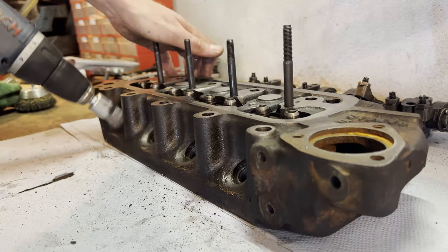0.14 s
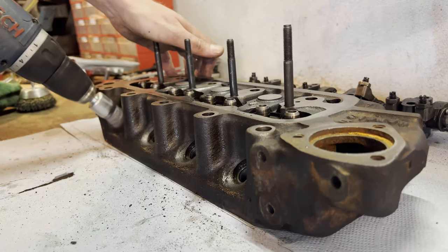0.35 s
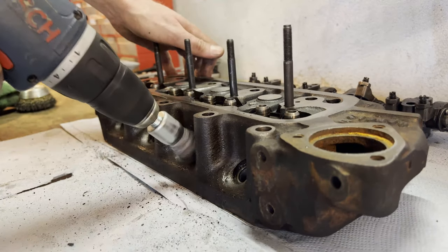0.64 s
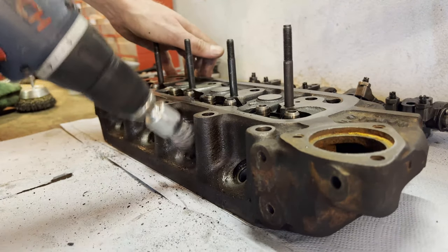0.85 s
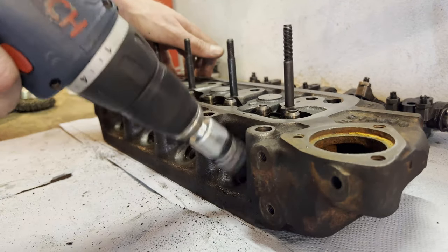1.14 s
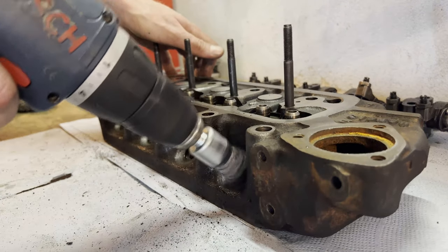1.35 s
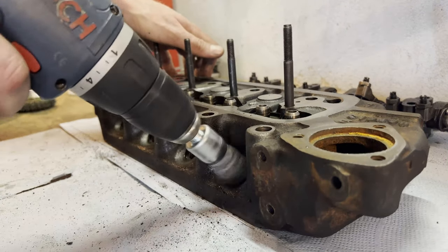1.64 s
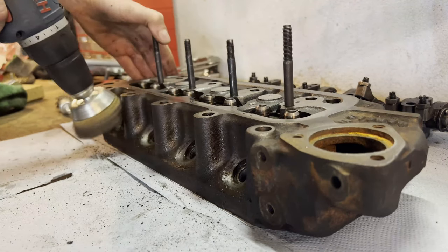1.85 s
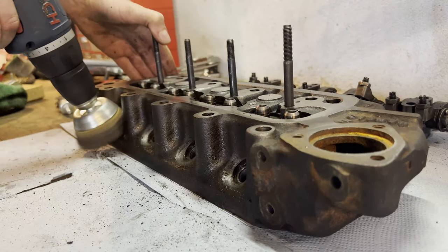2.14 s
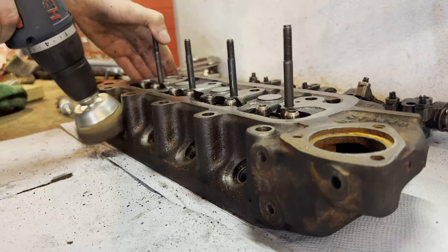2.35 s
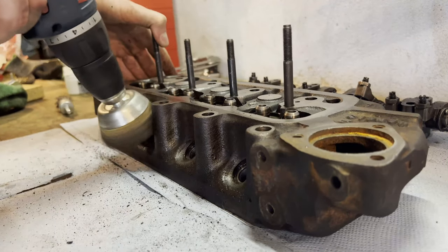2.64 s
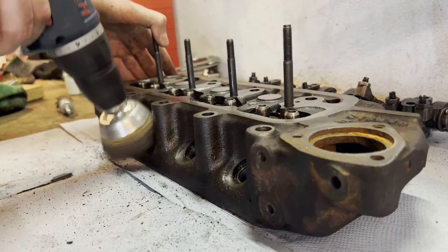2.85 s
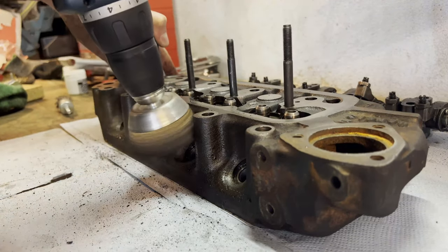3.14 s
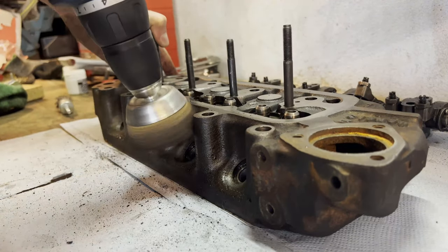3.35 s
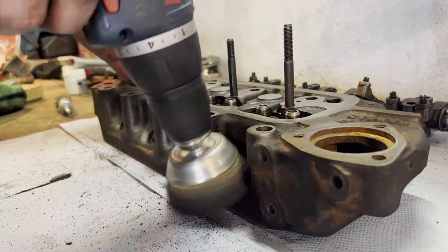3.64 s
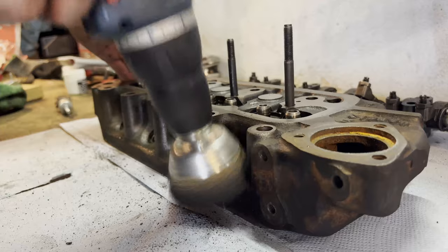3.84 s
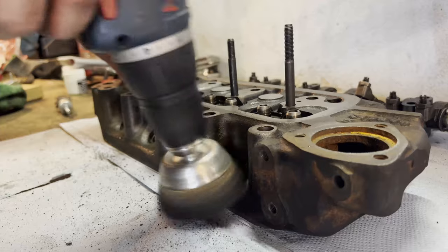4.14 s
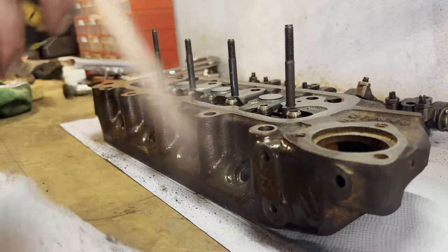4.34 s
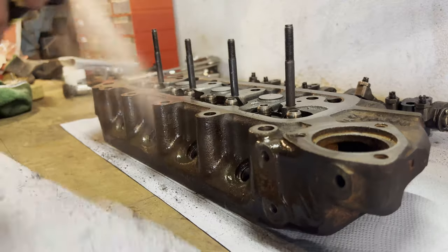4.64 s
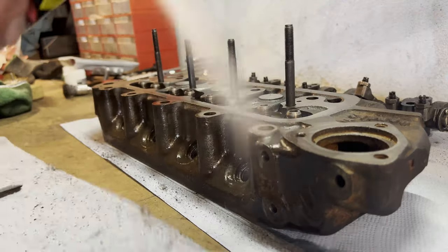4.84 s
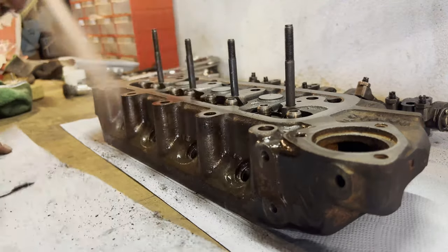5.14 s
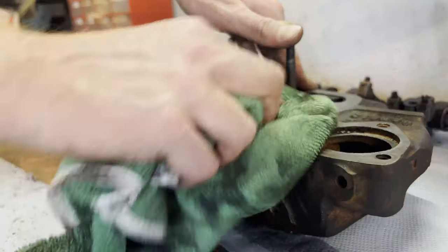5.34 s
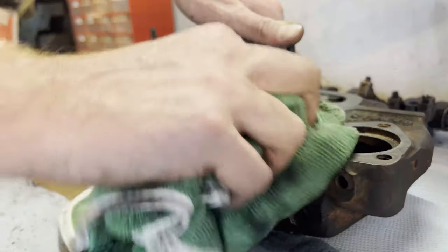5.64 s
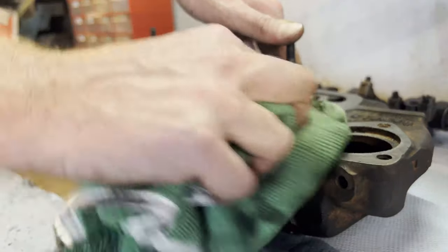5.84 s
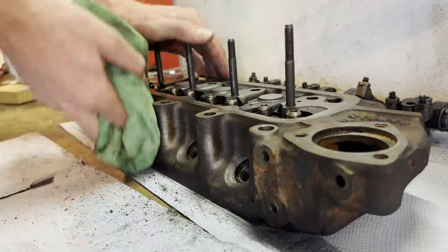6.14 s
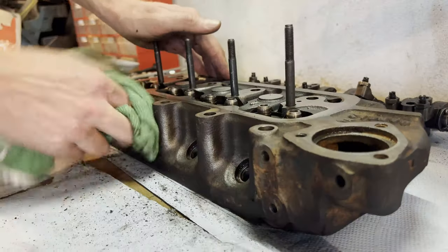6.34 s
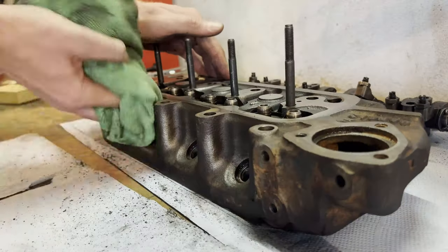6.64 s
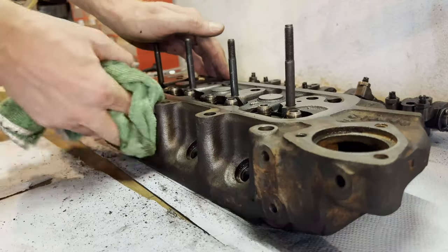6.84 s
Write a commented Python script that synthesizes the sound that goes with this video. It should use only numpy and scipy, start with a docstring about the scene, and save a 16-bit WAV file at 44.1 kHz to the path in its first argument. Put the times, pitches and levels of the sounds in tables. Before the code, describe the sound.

Close in a workshop, a cordless drill scrubs a cast-iron block with wire brushes: five continuous, hard-cut passes of dense metallic scratching under a wavering motor and gear whine. Two bursts of solvent spray follow, hissing and roaring hollowly against the iron. Then it drops to quiet, brief rag strokes with soft bumps over a faint room murmur. One close microphone, centred mono.

```python
"""A cordless drill spins wire brushes against a cast-iron block on a bench, in five passes joined by hard cuts.
Its bristles are dense random contacts ringing in the iron; the off-centre brush throbs once a turn, and motor
and gears whine as sines on multiples of the rotor speed. Then a can sprays solvent on the iron twice, made of
droplet contacts and low noise, and a rag wipes it in short strokes of fibre hiss and dull drag. A few soft bumps
ring bench and block, and a faint murmur of the shop lies under the wiping. One microphone."""
import sys
import numpy as np
from scipy import signal
from scipy.fft import rfft, irfft, next_fast_len
from scipy.io import wavfile
from scipy.ndimage import map_coordinates

SR = 44100
rng = np.random.default_rng(int(sys.argv[2]) if len(sys.argv) > 2 else 0)


def amplitude_ratio(level_db):
    """Convert a level in decibels to the matching linear amplitude (field) ratio."""
    exponent = np.asarray(level_db, float) / 20
    return 10 ** exponent


def dump_mix(stems):
    """Bounce the given channels to the path in sys.argv[1] as a 16-bit WAV at rate SR."""
    frames = np.atleast_2d(stems).T  # one column per channel
    limited = np.clip(frames, -1, 1)  # hard clip at full scale
    pcm = np.round(limited * 32767).astype(np.int16)
    wavfile.write(sys.argv[1], SR, pcm)


N = 308700  # length in samples


def rms_one(x):
    """Scale to rms 1."""
    return x / np.sqrt(np.mean(x ** 2) + 1e-20)


def in_span(rows, start, end):
    """First sample of a span in seconds, and a table's columns drawn as lines through its samples."""
    s, *columns = np.transpose(rows)
    first, last = round(start * SR), min(round(end * SR), N)
    t = np.arange(first, last) / SR
    return first, [np.interp(t, s, column) for column in columns]


def add(out, first, x):
    """Lay a piece into the scene, with a 2 ms fade at both ends so that the cuts do not click."""
    n = np.arange(len(x))
    to_nearest_end = np.minimum(n + 1, len(x) - n)
    out[first:first + len(x)] += x * np.clip(to_nearest_end / (.002 * SR), 0, 1)


def drift(size, rate):
    """Slow random wandering of spread 1: noise smoothed below about rate Hz, made at every 64th sample."""
    r = np.exp(-128 * np.pi * rate / SR)
    noise = rng.standard_normal(size // 64 + 502)
    slow = signal.lfilter([1], [1, -2 * r, r * r], noise)[500:]  # skip the filter's start
    slow = slow * np.sqrt((1 - r * r) ** 3 / (1 + r * r))
    return np.interp(np.arange(size) / 64, np.arange(len(slow)), slow)


def grains(size, per_s, spread_db):
    """Random tiny contacts, per_s of them a second on average, of uneven size and sign. rms 1."""
    sizes = amplitude_ratio(spread_db * np.minimum(rng.exponential(1, size), 5))
    signs = rng.choice([-1, 1], size)
    happens = rng.random(size) < per_s / SR
    return rms_one(sizes * signs * happens)


def coloured(x, spectrum, patchy_db, rate, modes=()):
    """Give x a spectrum and resonances; every narrow band then wavers on its own. rms 1."""
    size = next_fast_len(len(x))
    every_hz = np.maximum(np.arange(size // 2 + 1) * SR / size, 1)
    octave = np.log2(every_hz)
    hz, level_db = np.transpose(spectrum)
    lift = 1
    for mode_hz, width, db in modes:
        lift = lift + amplitude_ratio(db) / (1 + (2 * (every_hz - mode_hz) / width) ** 2)
    shaped = rfft(x, size) * amplitude_ratio(np.interp(octave, np.log2(hz), level_db)) * lift
    centres = np.r_[0, np.arange(7, 14, .25), 15]  # quarter-octave bands from 128 Hz up, in octaves above 1 Hz
    out = 0
    for k in range(len(centres)):
        weight = np.interp(octave, centres, np.arange(len(centres)) == k)
        band = irfft(shaped * weight, size)[:len(x)]
        out = out + band * amplitude_ratio(patchy_db * drift(len(x), rate))
    return rms_one(out)


def shelf(x, hz, kind, gain_db):
    """Raise or lower what lies above ("high") or below ("low") hz."""
    part = signal.sosfilt(signal.butter(2, hz, kind, fs=SR, output="sos"), x)
    return x + (amplitude_ratio(gain_db) - 1) * part


def surroundings(x, moves_per_s, wet_db, t60):
    """Near surfaces and hollows answer with a short dense tail, another one as the source moves on. rms 1."""
    hop, lag, out = int(SR / moves_per_s), np.arange(4000), x.copy()
    # long waves pass such small things by
    x = signal.sosfilt(signal.butter(2, 350, "high", fs=SR, output="sos"), x)
    for start in range(-hop, len(x), hop):
        tail = rng.standard_normal(len(lag)) * amplitude_ratio(-60 * lag / (t60 * SR))
        tail = tail / np.sqrt(np.sum(tail ** 2))
        n = np.arange(max(start - len(lag), 0), min(start + 2 * hop, len(x)))
        wet = signal.fftconvolve(x[n], tail)[:len(n)]
        crossfade = np.sin(np.pi * np.clip((n - start) / (2 * hop), 0, 1))
        out[n] += amplitude_ratio(wet_db) * wet * crossfade
    return rms_one(out)


# When the five passes, the two sprays and the wiping start, and then the end, in seconds.
# The spray, the rag and the drill below use it too.
CUTS = [0, .614, 1.748, 2.414, 3.581, 4.281, 5.056, 5.381, 7]
# Colour of the quiet shop. Each row: frequency in Hz, relative level in dB per Hz.
SHOP_COLOUR = [(18, -37), (30, -10), (107, 1), (247, -6.5), (448, -4), (754, -13), (2130, -15.5),
               (6530, -20.5), (15000, -42)]


def shop():
    """A faint murmur of the shop under the wiping: coloured noise whose bands waver."""
    first, out = round(CUTS[-2] * SR), np.zeros(N)
    noise = rng.standard_normal(N - first)
    add(out, first, coloured(noise, SHOP_COLOUR, patchy_db=4.0, rate=6.3) * amplitude_ratio(-62))
    return out


# Soft rings of bench and block. Each row: start in seconds, level in dB, frequency in Hz,
# time to fade by 60 dB in seconds.
BENCH_RINGS = [(0.059, -33, 137, 0.11), (5.385, -58, 460, 0.72), (5.955, -54, 458, 0.3),
               (6.213, -47, 626, 0.12), (6.57, -54, 72, 0.17)]


def bench():
    """Soft bumps set bench and block ringing: sines that rise over 10 ms while they die away."""
    t, out = np.arange(N) / SR, np.zeros(N)
    for s, db, hz, t60 in BENCH_RINGS:
        since = t - s
        fading = amplitude_ratio(db - 60 * np.maximum(since, 0) / t60)
        out += fading * np.clip(since / 0.01, 0, 1) * np.sin(2 * np.pi * hz * since)
    return out


# Strokes of the rag. Each row: middle in seconds, length between half-power points in seconds,
# fibre hiss in dB before the treble change, dull drag in dB, treble change above 2000 Hz in dB.
RAG_STROKES = [(5.482, 0.031, -58, -72, -1.5), (5.565, 0.04, -61, -71, -0.5),
               (5.672, 0.031, -57, -73, -0.5), (5.757, 0.027, -57, -67, -1), (5.84, 0.023, -61, -76, -2),
               (5.962, 0.057, -58.5, -58.5, -1.5), (5.968, 0.0088, -52, -52, 7),
               (6.064, 0.047, -66.5, -69, 7.5), (6.222, 0.037, -59.5, -54, -4),
               (6.306, 0.037, -66, -62, -1), (6.405, 0.056, -59, -55.5, 0), (6.565, 0.061, -59, -56.5, -6),
               (6.645, 0.048, -53, -51, -7), (6.72, 0.046, -88, -66, -9), (6.773, 0.014, -59, -60, -11),
               (6.944, 0.036, -63, -60.5, -2), (6.983, 0.04, -56.5, -63, -10)]
# Colour of the fibre hiss. Each row: frequency in Hz, relative level in dB per Hz.
FIBRE_COLOUR = [(590, -26), (1000, -19), (1620, -4), (1760, -8), (1920, -3.5), (2260, 0.5), (3150, -6),
                (6000, -4), (15600, -29)]
# Colour of the dull drag. Each row: frequency in Hz, relative level in dB per Hz.
DRAG_COLOUR = [(29, -34), (50, -5), (269, -4.5), (600, -4.5), (805, -7.5), (968, -5), (1610, -11.5),
               (2000, -29), (2600, -35), (4400, -120)]


def rag():
    """Fibres catch on the rough casting as a hiss; the drag of the hand dully shakes block and bench."""
    first, out = round(CUTS[-2] * SR), np.zeros(N)
    t = np.arange(first, N) / SR
    s, length, hiss_db, drag_db, treble_db = np.array(RAG_STROKES).T[:, :, None]
    swell = .5 ** ((2 * (t - s) / length) ** 2)  # each stroke's power, half down at its ends
    # overlapping strokes share the treble change by their power; between strokes it tends to none
    treble = (swell * treble_db).sum(axis=0) / (swell.sum(axis=0) + .05)
    fibres = coloured(grains(len(t), 7000, 3.0), FIBRE_COLOUR, patchy_db=1.0, rate=25)
    fibres = shelf(fibres, 2000, "high", treble)
    hiss = fibres * np.sqrt((swell * amplitude_ratio(2 * hiss_db)).sum(axis=0))
    drag = coloured(grains(len(t), 1800, 1.4), DRAG_COLOUR, patchy_db=1.5, rate=14.0, modes=[(593, 150, 0.0)])
    drag = drag * np.sqrt((swell * amplitude_ratio(2 * drag_db)).sum(axis=0))
    add(out, first, hiss + drag)
    return out


# Loudness of the two sprays. Each row: time in seconds, jet hiss in dB, low roar in dB.
SPRAY_LEVELS = [(4.285, -24, -39), (4.32, -25, -40), (4.485, -24, -42), (5.004, -25, -36.5),
                (5.04, -20.5, -44), (5.065, -26, -43), (5.301, -24, -38.5), (5.365, -25, -38.5)]
# Sweep of the jet along the block. Each row: time in seconds, pitch ratio of the hiss and its hollows.
JET_SWEEP = [(4.281, 1.02), (4.45, .97), (4.7, 1.01), (4.95, 1.03), (5.1, .98), (5.381, 1.01)]
# Colour of the jet hiss. Each row: frequency in Hz, relative level in dB per Hz.
JET_COLOUR = [(260, -44), (450, -21), (588, -7.5), (959, -6), (1270, -7.5), (1680, -4), (2480, -9.5),
              (3090, -2.5), (5270, -7.5), (7870, -9.5), (15600, -31)]
# Hollows of the block that the jet sets humming. Each row: frequency in Hz before the sweep,
# width in Hz before the sweep, strength added at the peak in dB relative to the plain hiss.
BLOCK_HOLLOWS = [(627, 22, -1), (965, 14, 5.5), (1780, 130, 2.5), (2210, 120, -9), (2680, 61, -2.5),
                 (3110, 43, -7), (4650, 140, -12), (5220, 130, -4)]
# Colour of the low roar. Each row: frequency in Hz, relative level in dB per Hz.
ROAR_COLOUR = [(29, -72), (50, -25.5), (226, -4), (259, 3), (303, -1.5), (520, -1.5), (680, -47),
               (1140, -120)]


def spray():
    """Jet hiss and droplets on the iron, and the low roar of the jet in the hollows of the block."""
    out = np.zeros(N)
    for k in (5, 6):  # the two spans after the five passes
        first, (jet_db, roar_db) = in_span(SPRAY_LEVELS, *CUTS[k:k + 2])
        droplets = grains(len(jet_db) + 4000, 14000, 2.3)  # some to spare for reading faster
        jet = coloured(droplets, JET_COLOUR, patchy_db=.4, rate=25, modes=BLOCK_HOLLOWS)
        first, (ratio,) = in_span(JET_SWEEP, *CUTS[k:k + 2])
        jet = map_coordinates(jet, [np.cumsum(ratio)], order=5)  # read faster or slower: higher or lower
        jet = surroundings(jet, moves_per_s=18, wet_db=-2.5, t60=.05)
        roar = coloured(rng.standard_normal(len(jet_db)), ROAR_COLOUR, patchy_db=2.5, rate=12)
        add(out, first, jet * amplitude_ratio(jet_db) + roar * amplitude_ratio(roar_db))
    return out


# Moments when one whine sings out. Each row: middle in seconds, length between half-power points
# in seconds, multiple of the rotor speed, rms level at the peak in dB before the flutter.
WHINE_SWELLS = [(.045, .07, 15, -30), (.08, .14, 7.5, -38), (.28, .1, 7.5, -37), (.355, .12, 15, -33),
                (.51, .22, 15, -34), (.7, .08, 10, -39), (.16, .22, 16, -37), (1.0, .35, 30, -45),
                (1.54, .22, 16, -40), (1.705, .07, 15, -31), (1.81, .07, 10, -32), (1.78, .07, 11, -36),
                (1.8, .07, 15, -34), (1.8, .12, 21, -39), (1.95, .12, 21, -36), (2.035, .07, 15, -33),
                (2.02, .18, 11, -36), (2.27, .26, 11, -35), (2.455, .05, 10, -31), (2.57, .2, 10, -35),
                (2.53, .14, 11, -38), (2.73, .24, 15, -33), (2.85, .1, 10, -38), (3.09, .14, 21, -34),
                (3.13, .18, 15, -33), (3.16, .1, 24, -35), (3.17, .06, 12.5, -36), (3.45, .3, 12.5, -39),
                (3.35, .08, 21, -36), (3.53, .14, 15, -36), (3.55, .14, 10, -37), (3.64, .14, 10, -33),
                (3.78, .1, 9, -34), (3.9, .06, 10, -34), (4.0, .06, 10, -34), (4.1, .1, 10, -35),
                (4.1, .15, 9, -39), (4.17, .1, 15, -35)]


def whine(first, speed, steady):
    """Sines on multiples of a slightly unsteady rotor speed; each flutters, and some swell for a moment."""
    turns = np.cumsum(speed * (1 + .001 * drift(len(speed), 25))) / SR
    t = (first + np.arange(len(speed))) / SR
    power = {multiple: amplitude_ratio(2 * db) for multiple, db in steady}
    for s, length, multiple, db in WHINE_SWELLS:
        if t[0] <= s < t[-1]:
            swell = amplitude_ratio(2 * db) * .5 ** ((2 * (t - s) / length) ** 2)
            power[multiple] = power.get(multiple, 0) + swell
    out = 0
    for multiple, p in power.items():
        flutter = amplitude_ratio(1.5 * drift(len(t), 14))
        tone = np.sin(2 * np.pi * (multiple * turns + rng.random()))  # random starting point
        out = out + np.sqrt(2 * p) * flutter * tone
    return out


# Throb of the off-centre brush. Each row is a pass: depth in dB up and down, starting point in turns.
THROBS = [(.5, .1), (.5, .1), (1.1, .1), (1.1, .1), (1.9, .82)]
# Rotor turns for one turn of the chuck.
ROTOR_TURNS_PER_CHUCK_TURN = 18.74
# Rotor speed, sagging under load and recovering, one list a pass.
# Each row: time in seconds, rotor speed in turns per second.
ROTOR_SPEED = [
    [(0, 244), (.07, 246), (.11, 241), (.24, 241.3), (.37, 248.3), (.614, 246)],
    [(.614, 255), (.84, 256.4), (1.5, 251.5), (1.66, 249.5), (1.748, 230)],
    [(1.748, 234), (1.814, 229), (1.87, 220), (1.984, 211.5), (2.16, 187.5), (2.21, 194), (2.25, 194.5),
     (2.29, 199), (2.33, 193.5), (2.414, 192)],
    [(2.414, 171), (2.47, 170), (2.55, 178), (2.732, 197.3), (2.838, 191.5), (3.051, 203.8), (3.2, 208.3),
     (3.581, 224.5)],
    [(3.581, 205.7), (3.698, 206.6), (3.814, 199.1), (3.931, 206.9), (4.164, 214.2), (4.281, 208)],
]
# Bristles on iron, one list a pass. Each row: time in seconds, scratch in dB before throb and treble change,
# treble change above 4000 Hz in dB.
BRISTLES = [
    [(0.0, -23, -13), (0.006, -26.5, -7.5), (0.6, -26.5, -5.5)],
    [(0.63, -27.5, -1.5), (1.684, -27.5, -2.5), (1.735, -31.5, -2)],
    [(1.765, -25.5, -1), (1.811, -23, -1.5), (2.4, -25, 1)],
    [(2.43, -24.5, 8), (3.462, -25, 8), (3.565, -24, 7)],
    [(3.6, -23.5, 6.5), (4.224, -23.5, 5.5), (4.265, -23, 3.5)],
]
# What iron, tool and bench ring with, one list a pass. Each row: frequency in Hz, relative level in dB per Hz.
IRON_COLOUR = [
    [(24, -61), (40, -29), (439, -19), (536, -21.5), (779, -6.5), (1000, -9.5), (1500, -4), (2280, -8.5),
     (3750, -6), (4580, -11), (7940, -15), (15600, -30.5)],
    [(24, -64), (40, -25), (213, -30.5), (254, -19), (310, -22), (705, -14.5), (840, -5.5), (1850, -8),
     (2400, -5), (3950, -8.5), (4500, -15), (7940, -14.5), (15600, -36.5)],
    [(24, -57), (40, -22), (98, -22), (351, -12.5), (592, -9), (905, -10), (1380, -5.5), (1780, -7),
     (2110, -7), (5320, -8), (8140, -18), (15600, -40.5)],
    [(24, -60), (40, -27), (96, -14.5), (224, -15), (563, -4.5), (819, -6.5), (1380, -0.5), (2400, 1),
     (3000, -0.5), (5070, -6.5), (12800, -34), (15600, -42.5)],
    [(24, -57), (40, -34), (91, -21.5), (198, -18.5), (563, -11), (861, -13.5), (1350, -5.5), (2060, -2),
     (2460, -8.5), (3310, -4.5), (5600, -13), (15600, -45.5)],
]
# Narrow resonances of the block that the small brush wakes in the first two passes. Each row: frequency in Hz,
# width in Hz, strength added at the peak in dB relative to the plain scratch.
SMALL_BRUSH_RESONANCES = [(478, 233, 7), (780, 33, 3.5), (1863, 83, -5)]
# The same for the cup brush in the other three passes. Each row: frequency in Hz, width in Hz,
# strength added at the peak in dB relative to the plain scratch.
CUP_BRUSH_RESONANCES = [(101.5, 14.5, 13), (570, 19, -3.5), (1374, 140, -1.5), (2950, 510, -5)]
# Steady whines, one list a pass. Each row: multiple of the rotor speed, rms level in dB before the flutter.
STEADY_WHINES = [
    [(1, -56.5), (7.5, -46), (8, -48), (15, -45), (16, -48)],
    [(1, -53), (10, -45), (15, -42), (30, -52)],
    [(7, -46), (10, -46), (11, -47), (15, -47), (21, -47)],
    [(7, -48), (10, -42), (11, -46), (15, -42), (21, -48)],
    [(7, -46), (9, -43), (10, -42), (16, -48)],
]


def drill():
    """Each pass: dense bristle scratches ringing in the iron, throbbing with the chuck, plus the whine."""
    out = np.zeros(N)
    for k, (throb_db, start) in enumerate(THROBS):
        first, (speed,) = in_span(ROTOR_SPEED[k], *CUTS[k:k + 2])
        first, (scratch_db, treble_db) = in_span(BRISTLES[k], *CUTS[k:k + 2])
        chuck_turns = np.cumsum(speed) / SR / ROTOR_TURNS_PER_CHUCK_TURN
        throb = throb_db * np.sin(2 * np.pi * (chuck_turns + start))
        modes = SMALL_BRUSH_RESONANCES if k < 2 else CUP_BRUSH_RESONANCES
        contacts = grains(len(speed), 14000, 2.5)
        scratch = coloured(contacts, IRON_COLOUR[k], patchy_db=.6, rate=16, modes=modes)
        scratch = surroundings(scratch, moves_per_s=7, wet_db=-8.5, t60=.055)
        scratch = shelf(scratch, 4000, "high", treble_db) * amplitude_ratio(scratch_db + throb)
        add(out, first, scratch + whine(first, speed, STEADY_WHINES[k]))
    return out


def scene():
    """All sources add up at one microphone, which feeds both channels."""
    return np.tile(shop() + bench() + rag() + spray() + drill(), (2, 1))


def low_pass(x):
    """Removes everything above the highest recorded frequency."""
    return signal.sosfilt(signal.butter(12, 15720, fs=SR, output="sos"), x)


def record(dry):
    """Peaks are rounded smoothly so that they stay below half of full scale."""
    mix = .5 * np.tanh(dry / .5)
    return low_pass(mix)


dry = scene()
out = record(dry)
dump_mix(out)
```